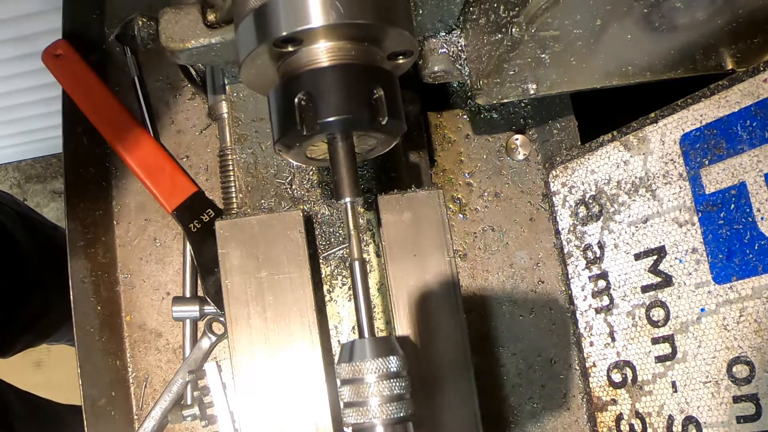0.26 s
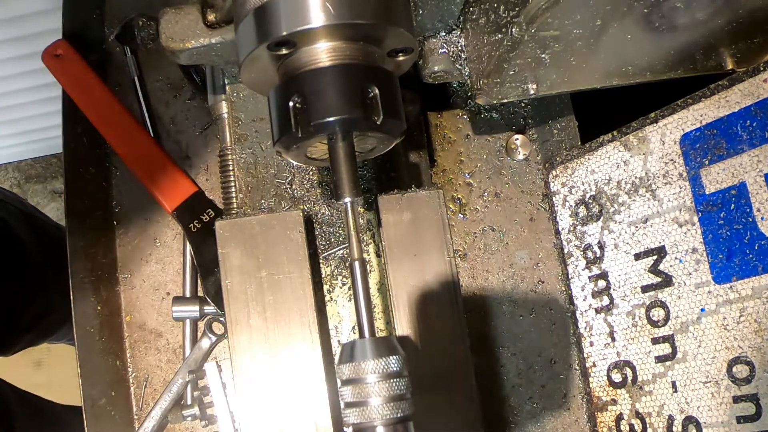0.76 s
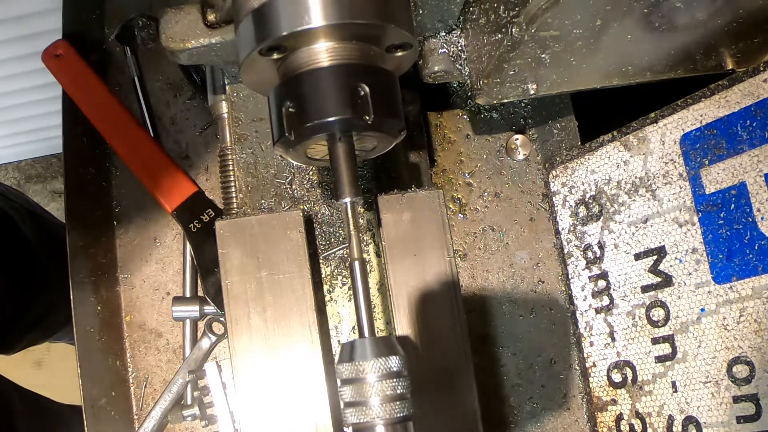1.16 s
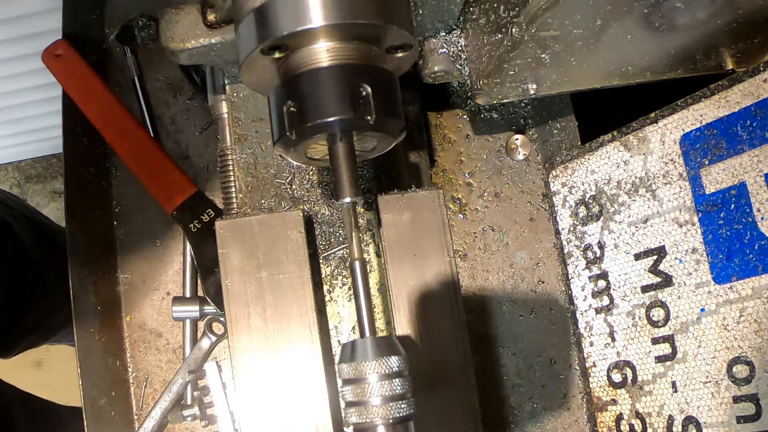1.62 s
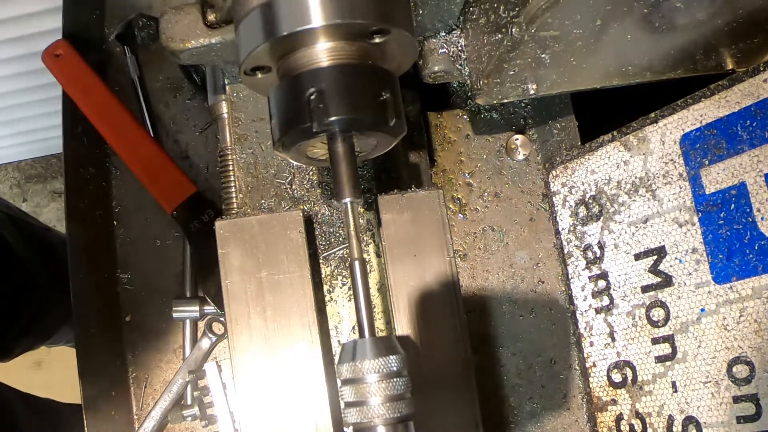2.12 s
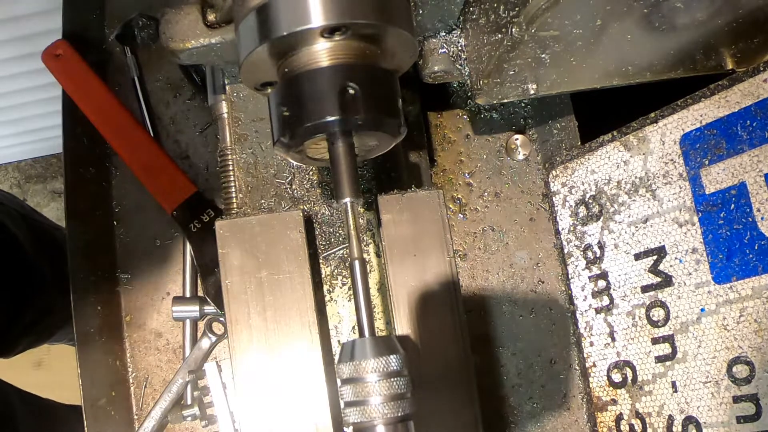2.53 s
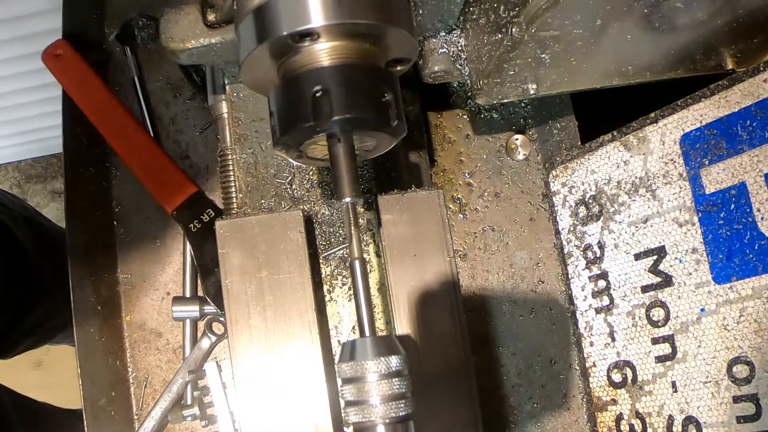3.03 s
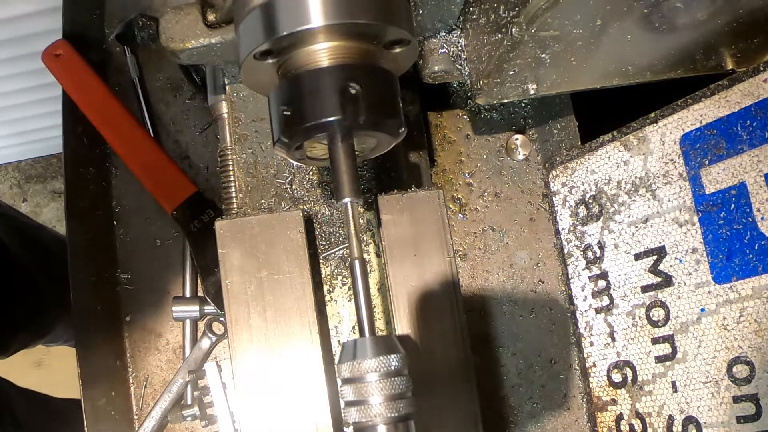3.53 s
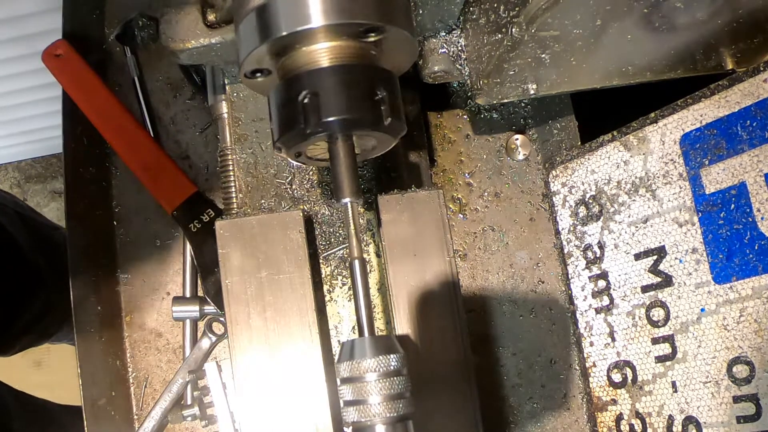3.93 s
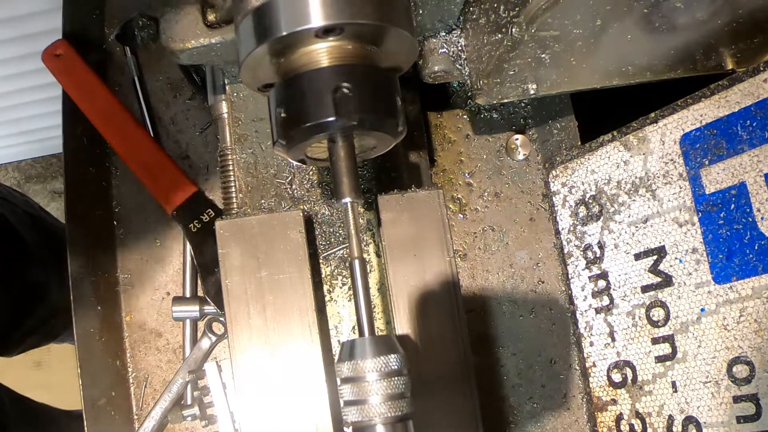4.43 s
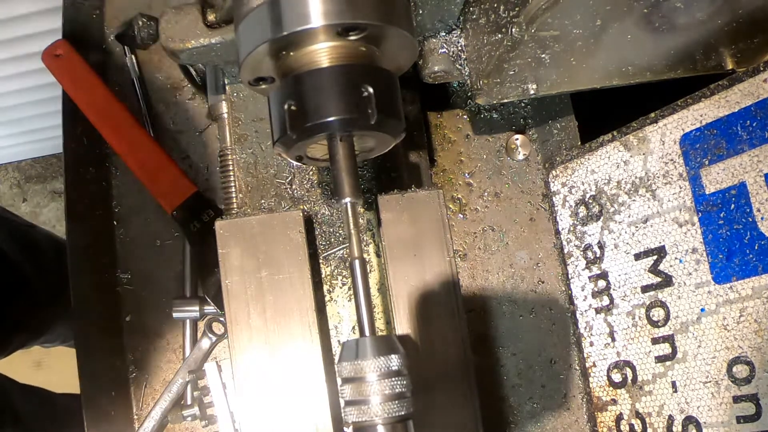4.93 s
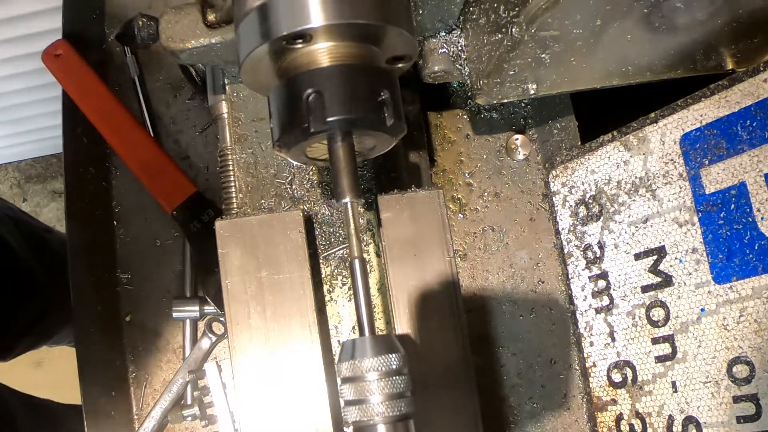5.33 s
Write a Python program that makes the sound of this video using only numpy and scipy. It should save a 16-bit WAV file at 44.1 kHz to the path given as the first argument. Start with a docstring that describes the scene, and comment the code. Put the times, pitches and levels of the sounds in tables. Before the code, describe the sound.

A small workshop hums quietly with low rumble, soft hiss and a wavering distant drone. From 0.4 to 0.75 s a tap crackles barely audibly in steel, with tiny metallic touches. A chip snaps and a knock sounds at 1.08 s, then a faint gritty cutting stroke runs to 1.6 s. Clunks at 1.67-1.73 s take up the wrench's slack; a fast bright ratchet burst follows until 2.1 s, speeding up then slowing, with a knock at 2.19 s. A slightly stronger cutting stroke with chip snaps lasts from 2.4 to 2.9 s. Knocks near 3.15 s start a quicker ratchet burst to 3.47 s, ending in a sharp clank at 3.57 s. Soft cutting returns from 3.9 to 4.4 s, knocks at 4.65 s, and a third burst from 4.75 to 5.05 s. Clunks build to the loudest clank at 5.2 s, with a low boom and rough steel ring fading. Close stereo, short diffuse tail.

```python
"""In a small humming workshop, a thread is tapped by hand in a steel bolt held in a lathe, the wrench close by.
On each slow forward stroke the tap crackles faintly: grainy noise through the colour of the cut, with chip snaps.
Then the handle knocks through its slack (noise in steel resonances) and swings back, clicking once per tooth
(noise bursts and decaying modes) as it speeds up and slows, and knocks home again. Soft touches ring single
resonances, the lathe booms once, and the room answers with a short diffuse tail."""
import sys
import numpy as np
from scipy import signal
from scipy.fft import rfft, irfft
from scipy.io import wavfile
from scipy.ndimage import uniform_filter1d

SR = 44100
rng = np.random.default_rng(int(sys.argv[2]) if len(sys.argv) > 2 else 0)


def master(y):
    """Save y as 16-bit WAV."""
    cut = np.clip(np.atleast_2d(y).T, -1, 1)
    pcm = np.round(cut * 32767)  # scale
    wavfile.write(sys.argv[1], SR, pcm.astype(np.int16))


N = 245195
TIME = np.arange(N) / SR
AFTER = TIME[:SR // 3]  # time since a hit [s]

# speed of the handle on each back swing: (time [s], speed [teeth/s])
SWING_SPEEDS = [
    [(1.7544, 51.5), (1.81, 84.1), (1.93, 56.4), (1.98, 51.8), (2.08, 14.8)],
    [(3.1983, 62.5), (3.29, 101.7), (3.36, 65.0), (3.41, 60.4), (3.45, 24.3)],
    [(4.7525, 41.0), (4.81, 65.0), (4.905, 68.9), (4.975, 45.3), (5.04, 8.0)],
]


def undb(db):
    """Decibels to gain."""
    return 10 ** (np.asarray(db) / 20)


def unit(x):
    """Scale to rms 1."""
    return x / np.sqrt(np.mean(x ** 2))


def fade(t, t60):
    """Exponential decay, 60 dB down after t60 seconds (1 ms at least)."""
    return np.exp(-np.log(1000) * t / max(t60, 1e-3))


def envelope(start, attack_s, end, t60):
    """Rise from start, hold until end, then die away."""
    rise = np.clip((TIME - start) / attack_s, 0, 1)
    return rise * fade(np.maximum(TIME - end, 0), t60)


def add(track, s, sound):
    """Mix a sound into the track at time s."""
    i = max(int(s * SR), 0)
    track[:, i:i + sound.shape[-1]] += sound[..., :N - i]


def noise(size, apart_hz=5000, spread=0.78):
    """Noise at two microphone ports: most alike in the bass, less related in the treble."""
    mid, side = rng.standard_normal((2, size))
    treble_side = signal.lfilter(*signal.butter(1, apart_hz, "high", fs=SR), side)
    side = spread * side + (1 - spread) * treble_side
    return unit(np.array([mid + side, mid - side]))


def walk(rate):
    """Slow random wander with a spread near 1, stepping at a rate in Hz and smoothed over one step."""
    k = int(SR / rate)
    steps = np.repeat(rng.standard_normal(N // k + 1), k)
    return unit(uniform_filter1d(steps, k)[:N])


def colour(x, spectrum):
    """Causal filter of unit energy through (frequency [Hz], level [dB]) points."""
    hz, db = np.transpose(spectrum)
    size = 4096
    bins = np.maximum(np.arange(size // 2 + 1), .5) * SR / size
    log_gain = np.log(undb(np.interp(np.log(bins), np.log(hz), db)))
    # folding the cepstrum gives the minimum-phase response
    cepstrum = irfft(log_gain)
    response = irfft(np.exp(rfft(2 * cepstrum[:size // 2], size)))
    response = response / np.linalg.norm(response)
    return signal.fftconvolve(x, response[None], axes=-1)[:, :x.shape[-1]]


def uneven(x, bands_hz, db):
    """Lift some bands and sink others, keeping the level."""
    return unit(colour(x, np.transpose([bands_hz, db]))) * np.std(x)


def resonate(x, hz, width_hz):
    """One resonance, gain 1 at its centre."""
    return signal.lfilter(*signal.iirpeak(hz, hz / width_hz, fs=SR), x)


def body(x, modes):
    """Steep resonances side by side, at rms 1: each a narrow filter, then one three times as wide."""
    total = 0
    for hz, width, db in modes:
        narrow = resonate(x, hz, width)
        total = total + undb(db) * resonate(narrow, hz, 3 * width)
    return unit(total)


def ring(modes, t, detune, apart_hz):
    """Decaying modes, with pitch, phase and port lag drawn once per call; high ones differ more in phase."""
    out = 0
    for hz, db, t60 in modes:
        pitch, phase, lag = rng.standard_normal(3)
        phases = np.pi * phase + lag * hz / apart_hz * np.array([[1], [-1]])
        tone = np.sin(2 * np.pi * hz * (1 + detune * pitch) * t + phases)
        out = out + undb(db) * fade(t, t60) * tone
    return out


def disperse(x, lag_s):
    """Bending waves in steel: the lows travel slower and come late (lag_s at 300 Hz)."""
    hz = np.fft.rfftfreq(2 * N, 1 / SR)
    phase = 4 * np.pi * lag_s * np.sqrt(400 * (hz + 100))
    return irfft(rfft(x, 2 * N) * np.exp(-1j * phase))[:, :N]


def turned(speed):
    """Angle of the handle, in teeth passed since the swing began."""
    return np.cumsum(np.interp(TIME, *np.transpose(speed), left=0, right=0)) / SR


def near(angle, tooth, width):
    """1 where the handle passes that tooth, falling off to either side (width in teeth)."""
    return np.exp(-.5 * ((angle - tooth) / width) ** 2)


def ratchet(snap_db=2.0, crack_db=8, ring_db=-1.5, rise_s=0.0018, snap_t60=0.05, crack_t60=0.0082,
            fresh=0.94, low_hz=5800, high_hz=10800, facing_db=3.0, left_db=2.2):
    """The pawl slips off each tooth and slaps the next: a crack and a dense steel snap, with the head's modes."""
    # ringing of the ratchet head: (frequency [Hz], relative level [dB], t60 [s])
    head_modes = [(2874, -19, 0.07), (3440, -16.5, .045), (3910, -20, .055), (4482, -9.5, 0.074),
                  (4800, -17, .04), (6164, -7, 0.055), (6656, -13, 0.079), (7320, -13, .035),
                  (7700, -11, .05), (8470, -14.5, .05), (8420, -8.5, .05), (9630, -7.5, 0.032),
                  (9580, -1.5, 0.026), (9970, -9.5, 0.063)]
    # spectrum of crack and snap: (frequency [Hz], level [dB])
    snap_spectrum = [(200, -29.5), (1500, -19.5), (2400, -13.5), (3400, -8), (5300, -8), (6300, 0.5),
                     (7600, -0.5), (8800, 1), (9500, 4.5), (10400, -8.5), (11200, -17), (14600, -21),
                     (15600, -46)]
    out = np.zeros((2, N))
    steel = noise(len(AFTER), apart_hz=9000, spread=.3)
    attack = np.minimum(AFTER / rise_s, 1)
    # one ring of the head serves every tooth
    head = undb(ring_db) * attack * ring(head_modes, AFTER, detune=0.0009, apart_hz=12000)
    snap = undb(snap_db) * fade(AFTER, snap_t60)
    crack = undb(crack_db) * fade(AFTER, crack_t60)
    shape = attack * (snap + crack)
    bright_band = signal.butter(2, [low_hz, high_hz], "bandpass", fs=SR)
    bands = np.arange(1000, 12000, 330)  # Hz
    facing = rng.standard_normal(len(bands))
    for s, db, treble_db in teeth():
        # each tooth keeps part of the steel's pattern from the one before
        steel = unit(steel + fresh * noise(len(AFTER), apart_hz=9000, spread=.3))
        click = colour(shape * steel, snap_spectrum) + head
        # as the head turns, other resonances face the microphone
        facing = .8 * facing + .6 * rng.standard_normal(len(bands))
        click = uneven(click, bands, facing_db * facing)
        # a squarer hit adds treble
        treble = signal.filtfilt(*bright_band, click)
        add(out, s, undb(db) * (click - treble + undb(treble_db) * treble))
    # the left channel is louder by left_db
    return out * undb(np.array([[left_db], [-left_db]]) / 2)


def teeth(dull_db=-5, bright_teeth=3.6, scatter_db=0.6):
    """One (s, level dB, treble dB) per tooth: the hand eases off; the pawl hits squarest at one angle."""
    # pawl on each swing: (first level [dB], change [dB/tooth], brightest at [tooth],
    # treble lift there above dull_db [dB])
    pawl = [(-23.5, -0.1143, 13.1, 7), (-23, -0.3716, 12.2, 8.5), (-25, -0.3, 9.36, 9)]
    for speed, (db, sag_db, brightest, lift_db) in zip(SWING_SPEEDS, pawl):
        angle = turned(speed)
        chance = scatter_db * rng.standard_normal((40, 2))
        for tooth in range(int(angle[-1]) + 1):
            s = np.searchsorted(angle, tooth, side="right") / SR
            level_db = db + sag_db * tooth + chance[tooth, 0]
            treble_db = dull_db + lift_db * near(tooth, brightest, bright_teeth) + chance[tooth, 1]
            yield s, level_db, treble_db


def handle(lift_db=5.5, lift_teeth=3.2, shudder_t60=0.2):
    """The dragging pawl keeps the long handle shuddering; each set of resonances speaks most at one angle."""
    # handle on each swing, levels away from the strongest angle:
    # (groan level [dB], groan strongest at [tooth], ring level [dB], ring strongest at [tooth])
    swings = [(-55, 10, -53, 16), (-56.5, 4.5, -48, 11), (-55, -4, -52, 12.7)]
    # low resonances of the handle: (frequency [Hz], width [Hz], relative level [dB])
    groan_modes = [(195, 32, 1.5), (422, 79, 0.5), (700, 300, -10)]
    # high resonances of the handle: (frequency [Hz], width [Hz], relative level [dB])
    ring_modes = [(1100, 120, -3), (1571, 57, 9), (2497, 670, -9)]
    groan = body(noise(N, spread=0.2), groan_modes)
    ringing = body(noise(N, spread=0.52), ring_modes)
    out = 0
    for speed, (groan_db, groan_tooth, ring_db, ring_tooth) in zip(SWING_SPEEDS, swings):
        angle = turned(speed)
        moving = envelope(speed[0][0], 0.0027, speed[-1][0] - .03, shudder_t60)
        for sound, db, tooth in (groan, groan_db, groan_tooth), (ringing, ring_db, ring_tooth):
            out = out + sound * moving * undb(db + lift_db * near(angle, tooth, lift_teeth))
    return out


def knocks(body_db=0, thud_db=3, edge_db=5, thud_t60=0.29, thud_rise_s=.007, edge_share=0.73,
           rise_s=0.0017, lag_s=0.0046, base_t60=0.08, halving_db=16.5):
    """Oily steel takes up its slack: a hard edge, the resonances of the work, and a thud that comes late."""
    # wrench and tap knock in their play, levels before body_db, thud_db and edge_db:
    # (time [s], body level [dB], thud level [dB], edge level [dB])
    hits = [(1.077, -46.5, -58, -56.5), (1.667, -50, -48, -54.5), (1.681, -41, -50.5, -43.5),
            (1.731, -40, -44.5, -43.5), (2.191, -40, -50, -48.5), (3.119, -49.5, -50, -56),
            (3.179, -51, -50, -58), (3.534, -55, -57.5, -64.5), (3.561, -41, -58.5, -60.5),
            (3.57, -34.5, -50.5, -34.5), (3.645, -44, -63, -53.5), (4.567, -54, -60, -63.5),
            (4.645, -51, -47, -62.5), (4.667, -42, -48.5, -49), (5.132, -37, -46.5, -41.5),
            (5.172, -42.5, -45.5, -54), (5.198, -24, -43.5, -39)]
    # resonances of the clamped work: (frequency [Hz], width [Hz], relative level [dB])
    work_modes = [(750, 100, 10.5), (916, 130, 4), (1210, 53, 8.5), (1560, 630, 0), (2896, 320, -9.5)]
    # spectrum of the thud: (frequency [Hz], level [dB])
    thud_spectrum = [(50, -6), (120, -9), (190, 6), (280, -1), (450, -0.5), (700, -7.5), (1500, -33),
                     (8000, -69.5)]
    # spectrum of the edge: (frequency [Hz], level [dB])
    edge_spectrum = [(1200, -3.5), (3000, 7), (4500, 1.5), (6500, -4), (9500, -12), (11500, -33.5),
                     (16000, -57.5)]
    slow, fast = np.zeros((2, 2, N))
    size = len(AFTER)
    attack = 1 - np.exp(-AFTER / rise_s)
    thud_shape = (1 - np.exp(-AFTER / thud_rise_s)) * fade(AFTER, thud_t60)
    bands = np.geomspace(250, 11000, 30)  # Hz
    for s, db, low_db, high_db in hits:
        # base_t60 holds at a table edge of -50 dB; a harder edge halves it every halving_db
        t60 = base_t60 * 2 ** (-(high_db + 50) / halving_db)
        work = body(noise(size, spread=.4), work_modes) * attack * fade(AFTER, t60)
        work = undb(db + body_db) * work
        thud = undb(low_db + thud_db) * noise(size, spread=0.26) * thud_shape
        edge = noise(size, spread=.4) * attack * fade(AFTER, edge_share * t60)
        edge = undb(high_db + edge_db) * edge
        # grip and load decide which resonances each knock wakes
        woken_db = 3.5 * rng.standard_normal(len(bands))
        add(slow, s, uneven(work + colour(thud, thud_spectrum), bands, woken_db))
        add(fast, s, uneven(colour(edge, edge_spectrum), bands, woken_db))
    return disperse(slow, lag_s) + fast


def cutting(cut_db=-2, grain_db=2.5, grain_s=0.0005, uneven_db=2.5, chip_db=-8, chip_t60=0.091):
    """Tiny fractures crackle along the cutting edges, catching unevenly; now and then a chip snaps."""
    # larger chips snap at the cutting edge: (time [s], level before chip_db [dB])
    chips = [(0.258, -64), (1.076, -37.5), (1.1545, -55), (1.2006, -53.5), (2.6637, -48), (2.8754, -47),
             (2.8916, -46), (2.974, -57.5), (4.128, -51), (4.2219, -50.5), (4.308, -52.5)]
    # spectrum of the cut: (frequency [Hz], level [dB])
    cut_spectrum = [(400, -5.5), (750, 0.5), (2200, 6.5), (3500, 1), (4500, 0), (5100, 4.5), (6500, -2.5),
                    (10300, -4), (11500, -13), (14000, -16.5), (15500, -32)]
    k = int(grain_s * SR)
    sizes = np.minimum(rng.exponential(size=N // k + 1), 3.5)
    grains = np.repeat(undb(grain_db * sizes), k)[:N]
    catch_db = uneven_db * walk(35)
    out = unit(noise(N) * grains) * load() * undb(cut_db + catch_db)
    chip_shape = fade(AFTER, chip_t60) * (1 - fade(AFTER, 0.002))
    for s, db in chips:
        add(out, s, undb(db + chip_db) * noise(len(AFTER)) * chip_shape)
    return colour(out, cut_spectrum)


def load(load_db=9, bite_s=0.16, ease_t60=0.66):
    """Effort on the tap: it bites, grows as chips fill the flutes, and lets go at the end of each stroke."""
    # forward strokes of the tap: (start [s], end [s], load level at the end, before cut_db [dB])
    strokes = [(0.4, 0.76, -76), (1.16, 1.607, -68), (2.397, 2.904, -63.5), (3.892, 4.392, -68)]
    total = 0
    for start, end, db in strokes:
        remaining = np.clip((end - TIME) / (end - start), 0, 1)
        total = total + envelope(start, bite_s, end, ease_t60) * undb(db - load_db * remaining)
    return total


def tinks(rise_s=0.00067, relative_width=0.076):
    """A faint squeak and soft touches on the steel wake single resonances, each a burst of narrow noise."""
    # (time [s], frequency [Hz], level [dB], t60 [s])
    touches = [(0.384, 2230, -60, 0.072), (.396, 4360, -62, 0.025), (.684, 733, -54, 0.13),
               (.738, 727, -51, 0.069), (2.058, 115, -49, .3)]
    out = np.zeros((2, N))
    attack = 1 - np.exp(-AFTER / rise_s)
    for s, hz, db, t60 in touches:
        tone = body(noise(len(AFTER)), [(hz, relative_width * hz, 0)])
        add(out, s, undb(db) * tone * fade(AFTER, t60) * attack)
    return out


def machine(boom_s=5.208, boom_db=-45, boom_rise_s=0.0019, linger_s=4.916, linger_rise_s=0.18,
            linger_hold_s=0.36, linger_t60=0.94, linger_db=-54, waver_db=2.0):
    """A rough ring hangs in the steel, and the hardest knock sets the lathe booming."""
    # resonances of the rough ring: (frequency [Hz], width [Hz], relative level [dB])
    linger_modes = [(1363, 100, 1.5), (1684, 220, -5), (2706, 99, -5), (3040, 190, -4), (3550, 400, -10),
                    (4490, 480, -14), (5000, 1630, -21)]
    # boom of the lathe: (frequency [Hz], relative level [dB], t60 [s])
    boom_modes = [(147, -2, 0.59), (205, 1.5, 0.5), (720, -15, 0.48)]
    # the hold counts from linger_s, so it includes the rise
    linger = envelope(linger_s, linger_rise_s, linger_s + linger_hold_s, linger_t60)
    out = body(noise(N, spread=0.62), linger_modes) * linger * undb(linger_db + waver_db * walk(30))
    t = TIME[:SR]
    boom = ring(boom_modes, t, detune=0.0016, apart_hz=2900) * (1 - np.exp(-t / boom_rise_s))
    add(out, boom_s, undb(boom_db) * boom)
    return out


def room(x, wet_db=-10, low_t60=0.24, high_t60=0.14, split_hz=4500, build_s=0.0063):
    """Machine bed and workshop walls return a short diffuse tail, its treble dying sooner."""
    t = TIME[:SR // 2]
    echoes = noise(len(t), apart_hz=1503, spread=0.277)
    low = signal.filtfilt(*signal.butter(2, split_hz, fs=SR), echoes)
    decaying = low * fade(t, low_t60) + (echoes - low) * fade(t, high_t60)
    tail = decaying * (1 - np.exp(-(t / build_s) ** 2))
    tail = tail / np.linalg.norm(tail[0])
    return x + undb(wet_db) * signal.fftconvolve(x, tail, axes=-1)[:, :N]


def workshop(air_db=-70.5, swell_db=0.7, waver_db=1.5):
    """Low rumble under steady hiss, and a wavering drone of distant machines in narrow bands of noise."""
    # spectrum of the air: (frequency [Hz], level [dB])
    air_spectrum = [(15, -7), (34, 3.5), (50, -4), (68, -1.5), (110, -23), (170, -10), (260, -9),
                    (480, -21), (750, -25), (1200, -22.5), (2500, -31), (5000, -28.5), (10000, -37.5),
                    (12500, -50)]
    # drone of the workshop: (frequency [Hz], width [Hz], mean level [dB])
    drone_modes = [(156.3, 24, -66), (200, 17, -68.5), (770, 150, -73.5)]
    hiss = unit(colour(noise(N, spread=0.099), air_spectrum)) * undb(air_db)
    # the rumble swells while the hiss stays smooth
    rumble = signal.filtfilt(*signal.butter(2, 300, fs=SR), hiss)
    swell = rumble * (undb(swell_db * walk(2.7)) - 1)
    drone = 0
    for hz, width, db in drone_modes:
        band = body(noise(N, spread=1.0), [(hz, width, 0)])
        drone = drone + undb(db + waver_db * walk(5.5)) * band
    return hiss + swell + drone


def scene():
    """Wrench, tap and touches answered by the room, with the lathe and the workshop beneath."""
    close = ratchet() + handle() + knocks() + cutting() + tinks()
    return room(close) + machine() + workshop()


def record(dry, top_hz=15800):
    """The recorder cuts the top with a steep low-pass."""
    return signal.sosfilt(signal.ellip(8, .2, 70, top_hz, fs=SR, output="sos"), dry)


dry = scene()
out = record(dry)
master(out)
```